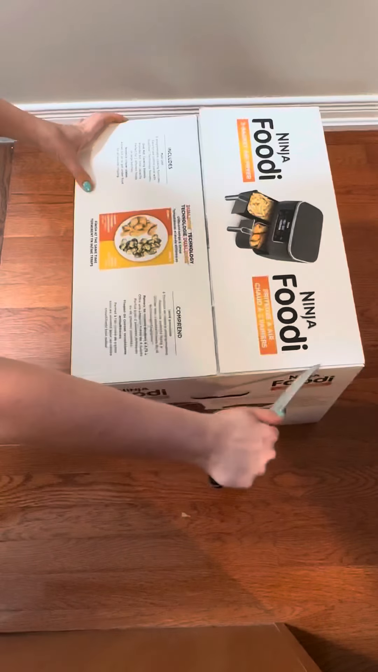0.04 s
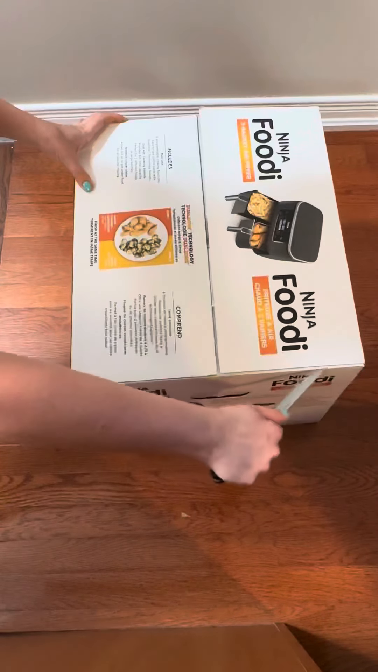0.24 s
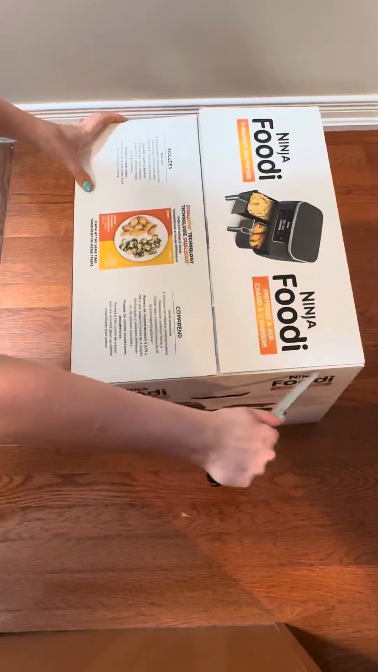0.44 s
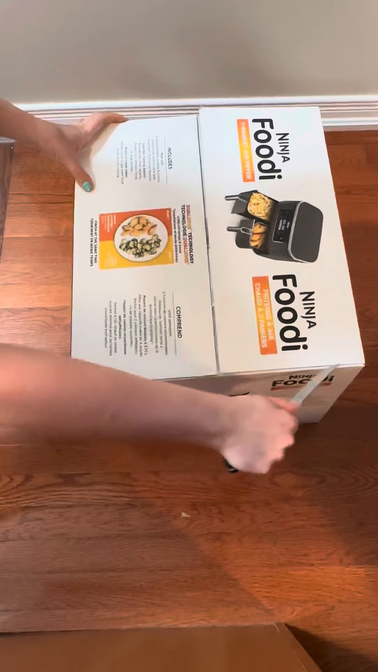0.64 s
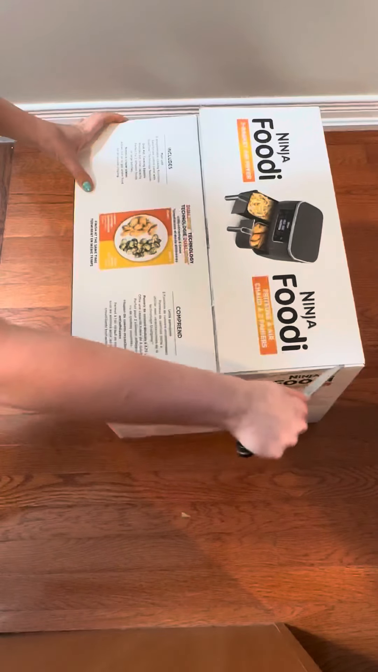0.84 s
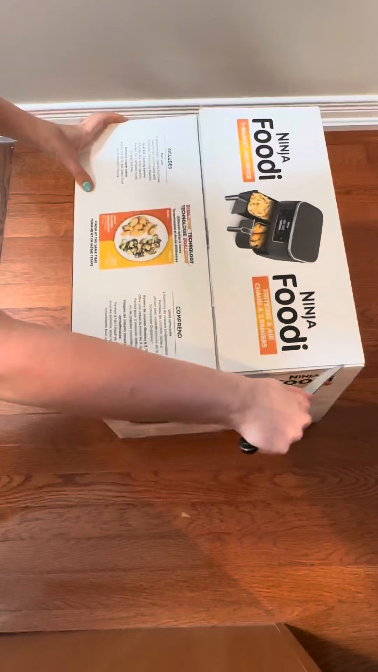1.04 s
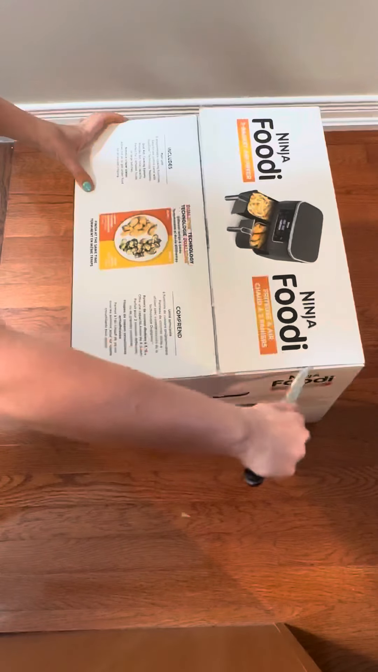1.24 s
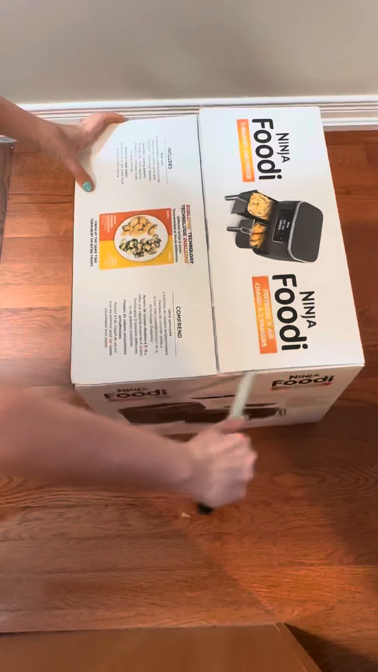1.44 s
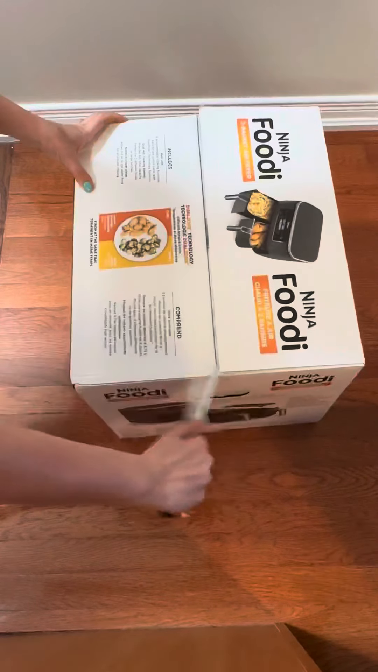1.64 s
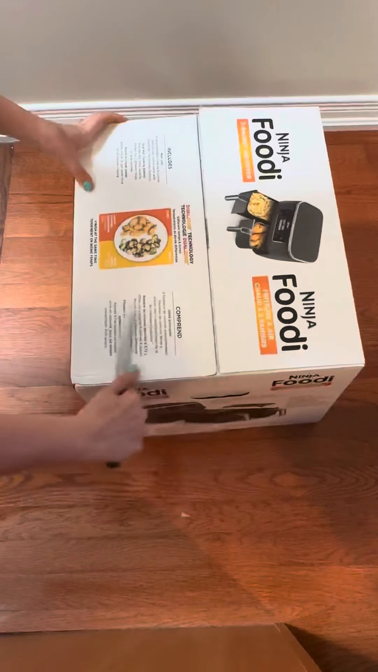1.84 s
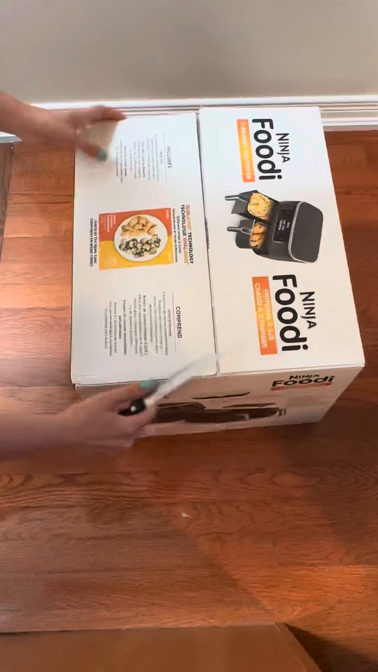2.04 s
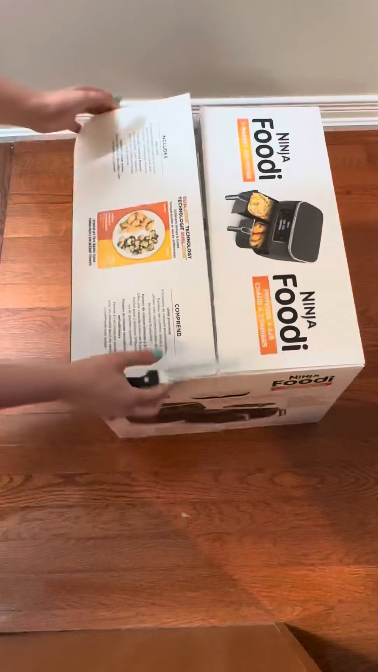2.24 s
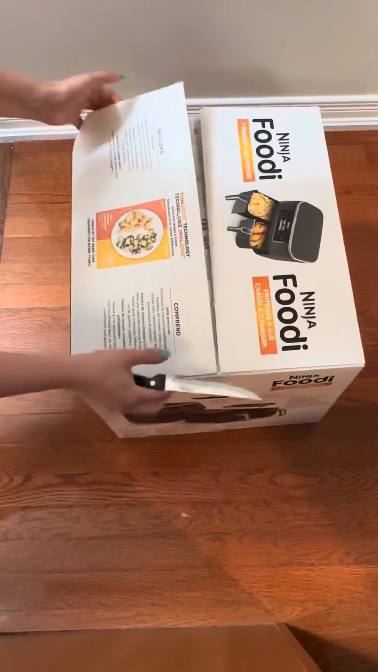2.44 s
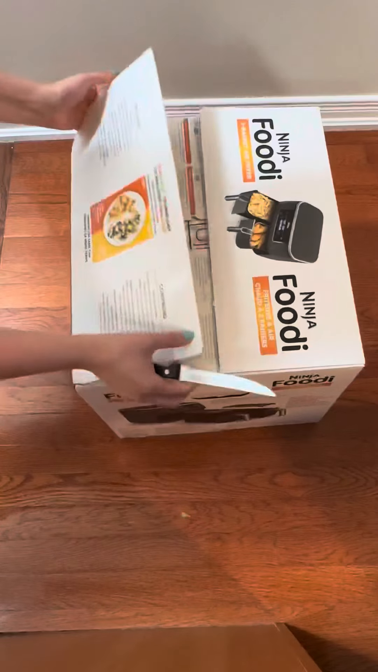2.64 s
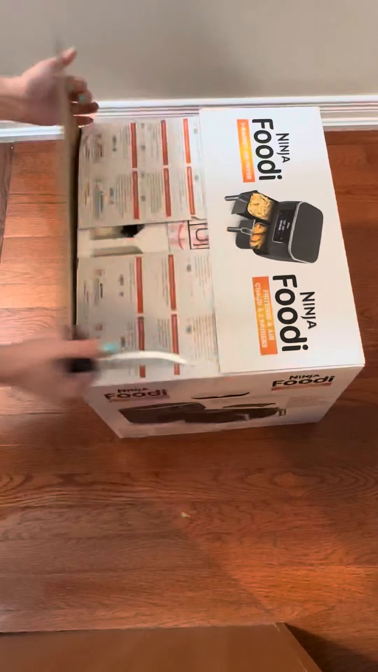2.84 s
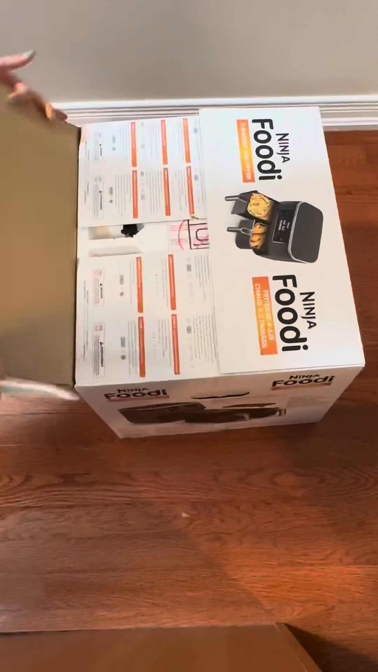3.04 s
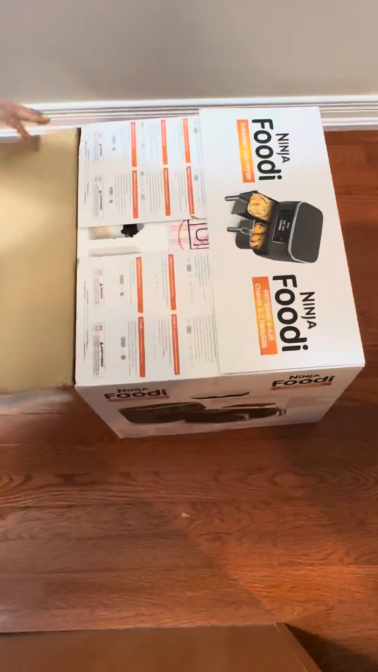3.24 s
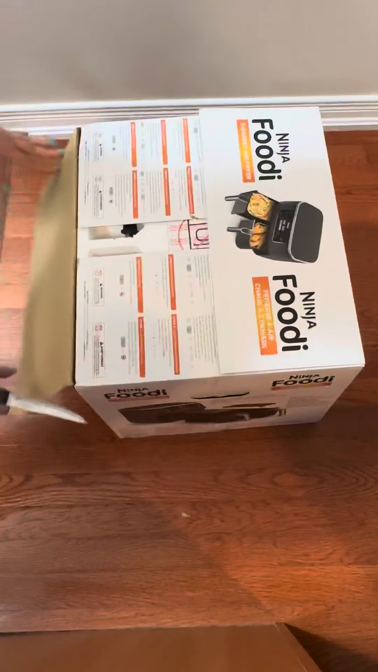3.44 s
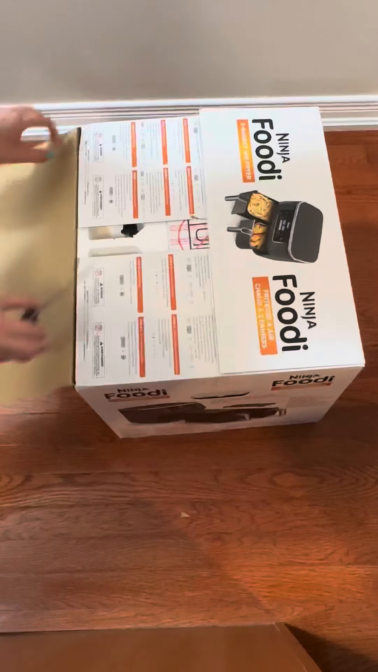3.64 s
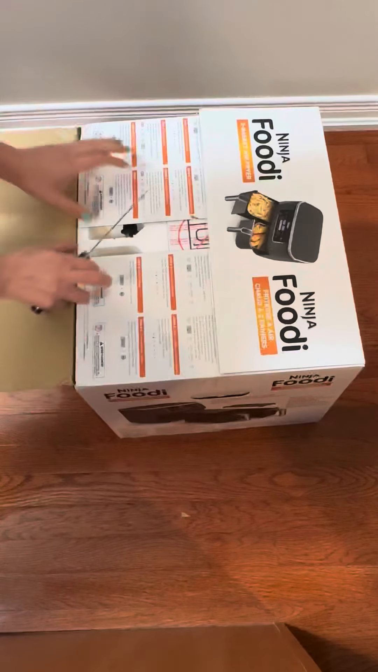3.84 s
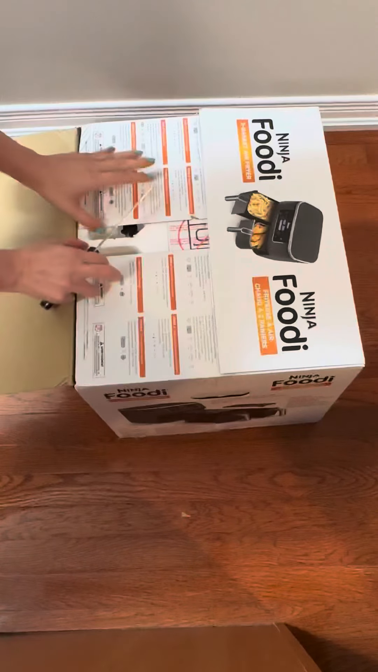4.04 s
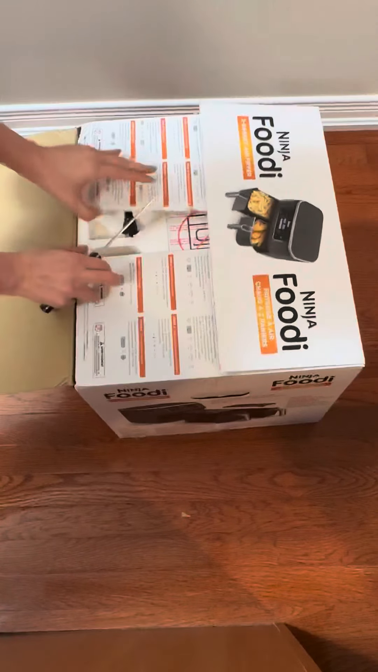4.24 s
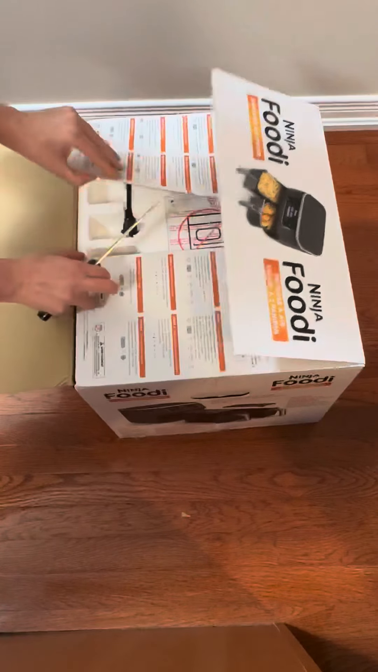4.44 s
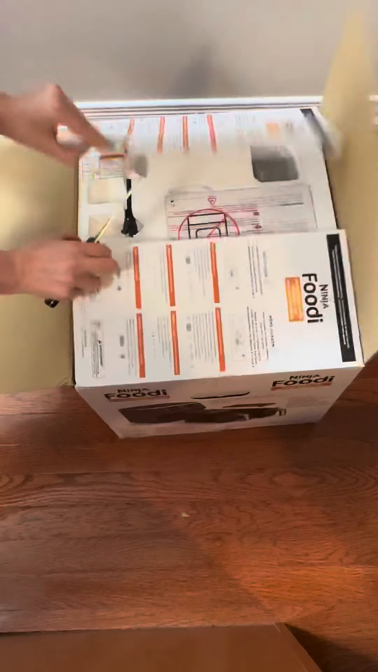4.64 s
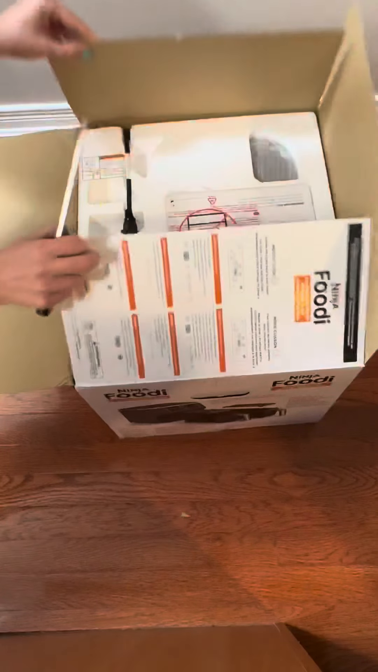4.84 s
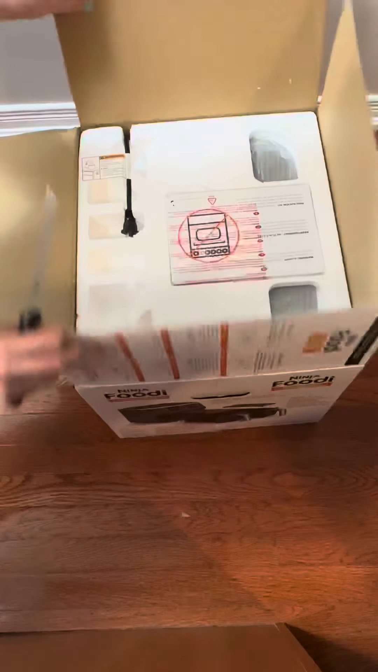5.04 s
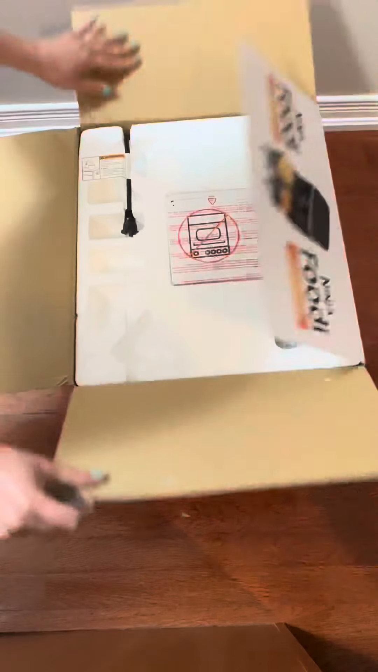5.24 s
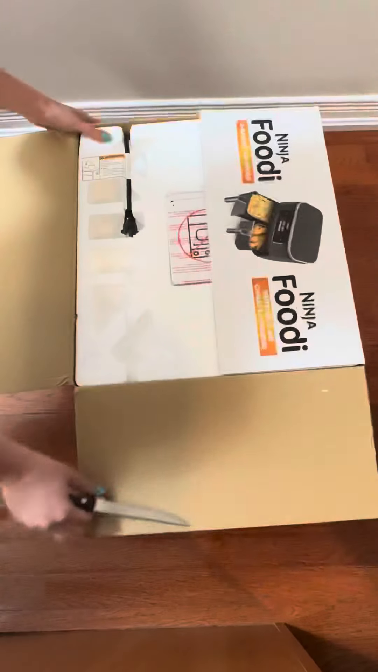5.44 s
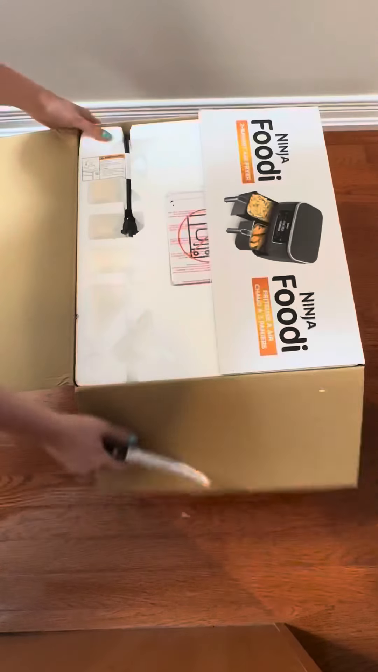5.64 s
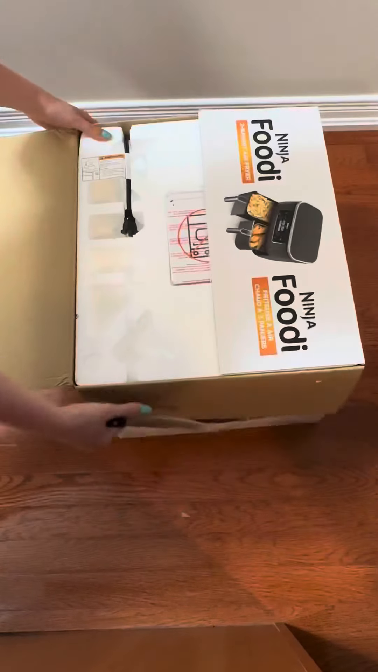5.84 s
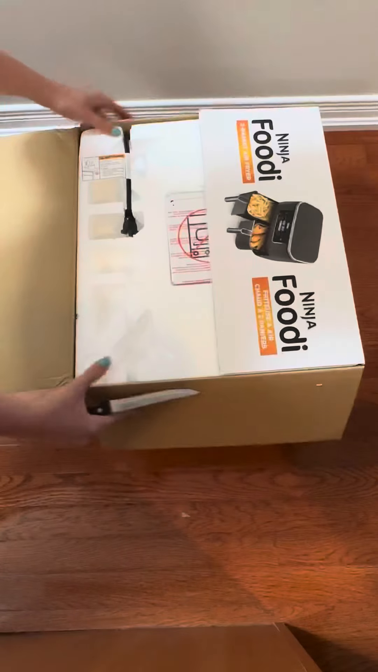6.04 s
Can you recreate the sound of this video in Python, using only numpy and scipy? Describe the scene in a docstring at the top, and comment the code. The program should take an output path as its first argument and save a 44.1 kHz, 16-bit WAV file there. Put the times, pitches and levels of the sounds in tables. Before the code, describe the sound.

Low, soft room hum throughout, close stereo pickup in a small live room. For the first second there are only faint ticks and barely audible rubbing. From 1.1 to 1.6 s a knife rasps through tape, swelling with a fast fluttering buzz, crisp snaps and a low groan, ending in a loud pop and dull thump at 1.55. Short creaks and crackle follow to 1.8, then light taps and small squeaks until 2.4. A sharp crack at 2.55 leads to board scraping and a heavy hollow thump at 2.95, with softer bumps to 3.3. Gentle scuffs and a light knock fill 3.4 to 4.4. At 4.6 the cardboard squeaks and groans; from 4.8 to 5.05 comes the densest burst of hard knocks, crackling creases and creaks. Sharp knocks at 5.29 and 5.39, a creak near 5.45, snapping fibres around 5.65, a knock at 5.75, and a final tap, scrape and tiny squeak at 6.0.

```python
"""Cutting and opening a cardboard box

A knife saws through the packing tape of a box on a wooden floor, then the flaps are pulled open.
Filtered noise grains, modulated at each flute, make the cut; swelling noise makes board slide on board.
Gliding tones make the stick-slip, runs of tiny rings the creases, short noise bursts the snapping fibres.
Blows add noise bursts, bending-wave chirps and damped modes; a small live room answers at two phone ports."""
import sys
import numpy as np
from scipy import signal
from scipy.fft import rfft, irfft
from scipy.io import wavfile

SR = 44100
rng = np.random.default_rng(int(sys.argv[2]) if len(sys.argv) > 2 else 0)


def dump(signal):
    """Clip the signal to [-1, 1] and save it as 16-bit WAV at the path in sys.argv[1]."""
    limited = np.clip(np.atleast_2d(signal).T, -1, 1)
    pcm = np.round(limited * 32767).astype(np.int16)
    wavfile.write(sys.argv[1], SR, pcm)


N = 269010
TIME = np.arange(N) / SR  # s
HIT_TIME = TIME[:SR // 3]  # s, the span of one short sound

# low noise of the panel under pressure: f/Hz, level/dB
RUMBLE = [(70, -49), (150, 13.5), (240, 11.5), (380, 12), (560, 5.5), (750, -25), (1300, -47.5)]
# middle band of board or tape rubbed: f/Hz, level/dB
SCRAPE = [(350, -9), (700, 14), (1050, 10.5), (1400, 6), (1900, 5.5), (2800, 5), (3800, -6), (6000, -47.5)]
# dull knock of a hard contact: f/Hz, level/dB
CLACK = [(300, -42.5), (560, -10), (700, -12.5), (950, -9), (1300, -18), (2000, -52)]
# fracture of the board: f/Hz, level/dB
CRACK = [(700, -29.5), (1300, -2.5), (1800, -1), (2300, -6), (2900, -5), (3800, -14), (6000, -31.5)]
# treble of fine fibres: f/Hz, level/dB
HISS = [(2200, -12), (3800, 3), (5000, 2), (6400, 6.5), (8000, 2.5), (10000, 5), (12500, -30.5),
        (15000, 10), (16500, -44)]


def undb(db):
    """Amplitude ratio: decibels to linear gain."""
    return 10 ** (np.asarray(db) / 20)


def unit(x):
    """Power normalisation: scale to rms 1."""
    return x / np.sqrt(np.mean(x ** 2))


def blow(x):
    """Energy normalisation: scale a short sound to the energy of 30 ms at rms 1."""
    return x / np.sqrt(np.sum(x ** 2) / (.03 * SR))


def colour(x, spectrum):
    """Minimum-phase filtering: the folded cepstrum of a (f/Hz, level/dB) outline gives a causal response."""
    size = 4096
    hz, db = np.transpose(spectrum)
    bins_hz = np.fft.rfftfreq(size, 1 / SR) + 1
    outline_db = np.interp(np.log(bins_hz), np.log(hz), db)
    cepstrum = irfft(np.log(undb(outline_db)))
    cepstrum[1:size // 2] *= 2
    cepstrum[size // 2 + 1:] = 0
    response = irfft(np.exp(rfft(cepstrum)))
    return signal.fftconvolve(x, response)[:len(x)]


def add(track, s, x):
    """Superposition: mix a sound in at time s."""
    i = max(int(s * SR), 0)
    track[i:i + len(x)] += x[:max(N - i, 0)]


def wander(rate):
    """Random modulation: a value of spread near 1 that moves between new draws, rate of them per second."""
    steps = rng.standard_normal(N // 20)
    return np.interp(TIME * rate, np.arange(len(steps)), steps)


def judder(rate, depth_db):
    """Uneven friction: the grip wanders in gain at the given rate."""
    return unit(undb(depth_db * wander(rate)))


def swell(s, half_s):
    """Gaussian envelope: a smooth rise and fall around time s."""
    return np.exp(-np.minimum(((TIME - s) / half_s) ** 2 / 2, 20))


def grains(rate, spread_db, smooth):
    """Granular friction: fibres catch and let go as clicks of uneven size over a smooth rub."""
    sizes = undb(spread_db * np.minimum(rng.exponential(size=N), 5)) * rng.choice([-1, 1], N)
    clicks = sizes * (rng.random(N) < rate / SR)
    return unit(unit(clicks) + smooth * rng.standard_normal(N))


def burst(spectrum, decay_s, tail_db, tail_s, rise_s):
    """Impulsive fracture: noise with a fast decay, followed by the slower decay of its scatter in the box."""
    shape = np.exp(-HIT_TIME / decay_s) + undb(tail_db) * np.exp(-HIT_TIME / tail_s)
    shape *= 1 - np.exp(-HIT_TIME / rise_s)
    return blow(colour(rng.standard_normal(len(shape)) * shape, spectrum))


def ring(modes, rise_s, scatter_db):
    """Modal vibration: damped modes build up as the bend spreads; each contact weights them anew."""
    hz, db, t60 = np.transpose(modes)[:, :, None]
    weight, detune, phase = rng.standard_normal((3, len(modes), 1))
    waves = np.sin(2 * np.pi * (hz * (1 + 0.0096 * detune) * HIT_TIME + phase))
    decay = np.exp(-np.log(1000) * HIT_TIME / t60)
    modal_sum = (undb(db + scatter_db * weight) * waves * decay).sum(axis=0)
    return blow(modal_sum * (1 - np.exp(-(HIT_TIME / rise_s) ** 2)))


def struck_near(modes, main_hz, lift_db):
    """Modal excitation: the place of a blow favours the modes near one frequency."""
    def lift(hz):
        return lift_db * np.exp(-(np.log(hz / main_hz) / 0.083) ** 2)
    return [(hz, db + lift(hz), t60) for hz, db, t60 in modes]


def bend(top_hz, crossing_s):
    """Dispersion: short bending waves arrive first, a falling chirp that starts lower for a lower top_hz."""
    slope_db_per_octave, low_hz = -4, 139
    hz = np.fft.rfftfreq(len(HIT_TIME), 1 / SR) + 1
    travel_s = crossing_s * np.sqrt(1000 / hz)
    late_s = np.clip(travel_s - np.interp(1.5 * top_hz, hz, travel_s), 0, .04) + .0005
    gain = undb(slope_db_per_octave * np.log2(hz))
    gain = gain / np.hypot(1, (hz / top_hz) ** 4) / np.hypot(1, (low_hz / hz) ** 3)
    # phase is the running sum of the group delay
    wave = irfft(gain * np.exp(-2j * np.pi * np.cumsum(late_s) * SR / len(HIT_TIME)))
    return blow(wave[:len(wave) // 2])


def resonate(x, peaks):
    """Resonance: a bank of (f/Hz, width/Hz, level/dB) peaks; soft board never rings sharply."""
    out = 0
    for hz, width, db in peaks:
        b, a = signal.iirpeak(hz, min(hz / width, 20), SR)
        out = out + undb(db) * signal.lfilter(b, a, x)
    return out


def knife():
    """Amplitude modulation: the tearing tape swells at each flute the blade bites; the lid under it drums."""
    # resonances of the taut tape and the lid under the blade: f/Hz, width/Hz, level/dB
    lid = [(422, 19, 14.5), (587, 43, 10.5), (790, 82, -15), (2050, 360, 0.5), (2470, 280, -0.5),
           (3130, 82, 1)]
    start_s, attack_s, end_s, release_s = 1.084, 0.26, 1.525, 0.095
    rasp_db, drum_db = -36, -40.5  # gains at full force
    flute_hz, flute_unrest = 49.92, .16  # flutes crossed per second; timing spread in flutes
    flute_gain = .9  # tearing between flutes
    bite_spread_db, bite_s = 3.5, .003

    # the blade is leaned on until it runs at full force, then comes free
    lean = np.clip((TIME - start_s) / attack_s, 0, 1) ** 1.27
    force = lean * np.clip(1 - (TIME - end_s) / release_s, 0, 1)

    gap, size, bright = rng.standard_normal((40, 3)).T
    times = end_s - (np.arange(len(gap)) + flute_unrest * gap) / flute_hz - 2 * bite_s
    bite, fine_bite = np.full((2, N), flute_gain)
    catch = np.exp(-(HIT_TIME / bite_s - 2) ** 2)
    for s, db, bright_db in zip(times, bite_spread_db * size, bite_spread_db * bright):
        add(bite, s, undb(min(db, bite_spread_db)) * catch)
        add(fine_bite, s, undb(min(bright_db, bite_spread_db)) * catch)

    tear = bite * grains(rate=3000, spread_db=3.0, smooth=0.93) * judder(rate=320, depth_db=2.6)
    fibres = fine_bite * grains(rate=1100, spread_db=1.5, smooth=0.77)
    edge = undb(-10.5) * unit(colour(tear, SCRAPE)) + undb(-18.0) * unit(colour(fibres, HISS))
    rasp = undb(rasp_db) * (edge + undb(-8.0) * unit(resonate(tear, lid)))
    drum = undb(drum_db) * unit(colour(grains(rate=900, spread_db=4.5, smooth=0.43), RUMBLE))
    return force * (rasp + force * drum)  # the drum grows with the square of the force


def sliding():
    """Sliding friction: board or hand drags over board in uneven jerks; pressure makes the panel rumble."""
    # strokes: t at the strongest/s, rise/s, fall/s, level/dB, brightness/dB, pressure on the panel/dB
    strokes = [(.221, 0.035, 0.038, -66, -11.5, -4), (.93, 0.15, 0.17, -71, -15, 7.5),
               (1.544, 0.0029, 0.0048, -25, 3.5, -4), (1.676, 0.007, 0.02, -38, -6, 4),
               (1.723, 0.022, 0.045, -51, -1.5, 3), (2.06, 0.046, 0.065, -55, 0, 7),
               (2.22, 0.034, 0.031, -57, 7.5, -6), (2.422, 0.037, 0.03, -49.5, 1, -4),
               (2.606, 0.043, 0.026, -46.5, 2, 10), (2.93, 0.066, 0.065, -50, -1, 0.5),
               (3.11, 0.032, 0.029, -53, 1, 6), (3.25, 0.03, 0.041, -43.5, -7.5, -3),
               (3.362, 0.0042, 0.026, -46.5, -13.5, 3.5), (3.55, 0.14, 0.14, -62.5, -11, 4),
               (3.609, 0.012, 0.015, -48.5, -3.5, -2), (3.643, 0.0054, 0.0095, -45, -9.5, 2),
               (3.927, 0.02, 0.037, -51, -3, 3), (4.1, 0.049, 0.074, -51, -5.5, -1.5),
               (4.35, 0.069, 0.12, -58.5, -4, 6.5), (4.628, 0.024, 0.025, -35, 1.5, -6.5),
               (4.895, 0.011, 0.066, -41, -17, -9), (4.915, 0.0031, 0.014, -39.5, 7.5, -9),
               (5.036, 0.023, 0.041, -31, -1.5, -8), (5.185, 0.0026, 0.011, -38, 6, 1),
               (5.35, 0.073, 0.046, -50, 1, 3), (5.476, 0.014, 0.022, -34.5, 2, -4),
               (5.66, 0.034, 0.1, -53.5, 6.5, 6.5), (6.035, 0.024, 0.056, -42, -0.5, 2)]
    # colour of the finest fibres: f/Hz, level/dB
    sizzle_spectrum = [(7000, -21), (10000, 19), (12500, -7), (15000, 19), (16500, -51)]
    shape = 1.4  # 1 = pointed swell, 2 = rounded
    crackle_db = -12  # against the stroke

    scrape, rumble, hiss = np.zeros((3, N))
    for s, rise_s, fall_s, db, bright_db, pressure_db in strokes:
        away = np.maximum((s - TIME) / rise_s, (TIME - s) / fall_s)
        stroke = undb(db) * np.exp(-np.minimum(away ** shape / 2, 20))
        scrape += stroke
        rumble += undb(pressure_db) * stroke
        hiss += undb(bright_db) * stroke
    sizzle = undb(-53) * hiss * (hiss / undb(-31)) ** 0.12  # a harder rub is brighter

    rub = grains(rate=4000, spread_db=-0.5, smooth=0.62) * judder(rate=65, depth_db=3.5)
    layers = (rumble, RUMBLE), (scrape, SCRAPE), (hiss, HISS), (sizzle, sizzle_spectrum)
    rubbing = sum(gain * unit(colour(rub, spectrum)) for gain, spectrum in layers)
    return rubbing + undb(crackle_db) * scrape * crackle()


def crackle():
    """Random impulses: single fibres break now and then, with the crack and hiss of the board."""
    breaks_per_s, spread_db = 29, -16
    sizes = undb(spread_db * np.minimum(rng.exponential(size=N), 3))
    breaks = sizes * (rng.random(N) < breaks_per_s / SR)
    pop = burst(CRACK, decay_s=0.0013, tail_db=4, tail_s=0.013, rise_s=0.00038)
    pop = pop + undb(-11.0) * burst(HISS, decay_s=0.00042, tail_db=15, tail_s=0.0082, rise_s=0.000067)
    return unit(signal.fftconvolve(breaks, pop)[:N])


def chatter():
    """Stick-slip: an edge grips and slips in step with a resonance, unsteady in pitch and strength."""
    # groans to squeaks: t at the strongest/s, half length/s, f/Hz, glide/(octaves per s), level/dB
    slips = [(1.44, 0.071, 149.8, 0, -38.5), (1.612, 0.029, 231.8, 2.5, -36), (1.733, 0.017, 422, 3, -31.5),
             (1.745, 0.019, 576, 1.5, -40.5), (2.158, 0.016, 1603, -4.5, -51.5),
             (2.388, 0.01, 1650, 3.5, -49.5), (2.417, 0.033, 2870, 0, -52), (2.432, 0.017, 1990, -1, -44.5),
             (4.604, 0.028, 2410, -4, -41), (4.605, 0.021, 1763, -0.5, -44), (4.619, 0.034, 770, 0, -42.5),
             (4.657, 0.017, 387, -6.5, -34.5), (4.603, .06, 396.6, -1, -43.5),
             (4.915, 0.022, 620, -1, -30.5), (4.963, 0.014, 530.3, 1, -29),
             (5.023, 0.013, 522.6, -1.5, -28.5), (5.065, .028, 248.2, -2, -38.5),
             (5.438, 0.027, 356.2, -0.5, -39.5), (5.482, .011, 781, 1, -37.5),
             (5.495, 0.017, 350.3, 3, -37.5), (6.012, 0.007, 2770, 0, -40), (6.014, 0.0065, 3520, 2.5, -42),
             (6.045, 0.024, 2730, -1, -52), (6.03, 0.021, 1470, 1, -50)]
    groan_unrest, squeak_unrest = .055, .08  # pitch spread as a fraction of f

    out, grip = np.zeros(N), judder(rate=170, depth_db=3.5)
    for s, half_s, hz, glide, db in slips:
        unrest = np.interp(hz, [700, 2400], [groan_unrest, squeak_unrest])
        near = np.abs(TIME - s) < 4 * half_s
        t = TIME[near]
        # the pitch moves to a new random value every two cycles
        drift = np.interp((t - t[0]) * hz / 2, np.arange(1024), rng.standard_normal(size=1024))
        pitch_hz = hz * 2 ** (glide * (t - s)) * (1 + unrest * drift)
        tone = np.sqrt(2) * np.sin(2 * np.pi * np.cumsum(pitch_hz) / SR)
        out[near] += undb(db) * (swell(s, half_s) * grip)[near] * tone
    return out


def crumples():
    """Successive fracture: a crease gives way in a run of tiny rings, each with its own pitch and size."""
    # creases and torn edges: t at the strongest/s, half length/s, central f/Hz, level/dB
    creases = [(0.941, .03, 3830, -67.5), (1.673, 0.0076, 2650, -39.5), (1.715, .018, 1770, -39.5),
               (2.141, 0.0019, 1980, -46), (2.27, 0.0057, 2760, -53), (2.426, 0.03, 2010, -50),
               (4.575, 0.038, 2360, -43.5), (4.633, 0.021, 2970, -44), (4.822, 0.011, 1700, -32.5),
               (4.93, .022, 2020, -35), (5.041, 0.024, 2250, -50), (5.441, 0.006, 1420, -31)]
    fractures_per_s, spread_octaves, spread_db = 700, .7, 3.2
    ring_cycles = 1.8  # cycles in which a ring falls to 1/e

    out = np.zeros(N)
    t = HIT_TIME[:SR // 100]
    for s, half_s, hz, db in creases:
        run = np.zeros(N)
        count = int(4 * half_s * fractures_per_s) + 1
        when, pitch, size = rng.standard_normal((200, 3))[:count].T
        times = s + half_s * np.linspace(-2, 2, len(when)) + when / fractures_per_s / 2
        pitches_hz = hz * 2 ** (spread_octaves * np.tanh(pitch))
        for at, f, size_db in zip(times, pitches_hz, spread_db * size):
            add(run, at, undb(size_db) * np.sin(2 * np.pi * f * t) * np.exp(-f * t / ring_cycles))
        out += undb(db) * blow(run * swell(s, half_s))
    return out


def knocks():
    """Impact excitation: contact cracks, a bending wave runs out, panels ring, the flap swings and moves air."""
    # blows on the box: t/s, level/dB, hardness of contact/dB, swing of the flap/dB, favoured panel f/Hz,
    # bending wave level/dB, its top f/Hz, its travel time at 1 kHz/s, favoured board f/Hz, board ring level/dB
    blows = [(1.545, -24.5, -25, -14, 232, 2, 610, 0.00514, 940, -11.5),
             (1.551, -24.5, -20, -25, 391, -7, 600, .005, 635, -19),
             (1.819, -35.5, -29, -29, 392, -4, 590, 0.00517, 635, -6.5),
             (2.193, -42, 14, 0.5, 214, 8.5, 3540, 0.00704, 1850, -2),
             (2.473, -46, -28, -16, 287, 7, 510, 0.0039, 635, -4),
             (2.55, -30.5, 12, -2, 307, 4, 2985, .0085, 705, -2),
             (2.942, -24.5, -5.5, 3.5, 230, 1.5, 563, 0.00613, 887, -18),
             (2.946, -24, -19, -25, 464, -3, 910, 0.00544, 635, -25),
             (3.003, -36, -34, -12, 463, -6, 497, .004, 710, -8),
             (3.108, -41.5, -24, 4.5, 232, 1, 330, 0.0041, 630, -4),
             (3.28, -32.5, -26, 1.5, 243, 8, 402, 0.00513, 635, -11),
             (3.892, -38, -6.5, -20, 545, 3.5, 963, 0.00603, 887, -2.5),
             (4.799, -19.5, 0.5, -12, 360, -2, 1320, 0.00415, 684, -14),
             (4.808, -21, 2.5, -16, 449, 1.5, 1370, 0.00403, 1160, -1.5),
             (4.825, -26.5, 7, -9, 232, -4, 795, 0.0039, 1060, -2),
             (4.876, -25.5, -11, -15, 390, -1, 1150, 0.0052, 834, -3),
             (4.91, -32.5, -4, -10.5, 283, -1, 800, .005, 635, -7),
             (4.942, -34, 12.5, -25, 528, -13, 1490, 0.0054, 1305, -5),
             (5.01, -37.5, -4, -18, 528, -16, 1470, 0.0048, 887, 5),
             (5.2851, -24, 3, -26, 254, 1, 2870, .0085, 657, 0),
             (5.344, -34.5, -12, -22, 302, -14, 790, 0.0043, 705, -0.5),
             (5.3893, -23, 0, -18, 355, -3.5, 1970, .004, 1660, -1),
             (5.408, -30, 0, -7.5, 215, -14, 800, 0.00484, 705, -8),
             (5.634, -33, -7, -17, 236, -1, 910, 0.0072, 830, -6.5),
             (5.748, -31.5, 7, -5.5, 562, 5.5, 1965, .008, 645, -1),
             (5.973, -34, 10, -10, 305, 2, 2070, 0.00296, 1630, -10)]
    # flap swinging on the air in the box: f/Hz, level/dB, t60/s
    flap_modes = [(82.3, 2, 0.22), (107, -14, 0.12), (134, -7.5, 0.22)]
    # panels of the box: f/Hz, level/dB, t60/s
    panel_modes = [(210, -7, 0.18), (230.2, 5, 0.2), (279.7, 1, 0.43), (304.8, -1, 0.11), (359.3, 2, 0.2),
                   (399, -7, 0.15), (421, 9.5, 0.053), (464, 0.5, 0.08), (525, 7.5, 0.055), (603, 3, 0.083)]
    # stiff short waves in the board: f/Hz, level/dB, t60/s
    board_modes = [(631.5, -2, 0.2), (700, -3.5, 0.1), (788, -1.5, 0.1), (877, -2.5, 0.098),
                   (1045, -5.5, 0.093), (1152, 2.5, 0.028), (1320, 0.5, 0.086), (1648, 0.5, 0.044),
                   (1846, 7, 0.021)]
    # air pushed out by a swinging flap: f/Hz, level/dB
    puff = [(15, -24.5), (28, -13), (45, -5), (70, -6), (100, -9.5), (135, -3), (200, -32), (400, -56)]
    clack_per_hardness, snap_per_hardness = 0.23, 0.99  # dB per dB of hardness

    out = np.zeros(N)
    for s, panel_db, hard_db, swing_db, main_hz, bend_db, top_hz, travel_s, board_hz, board_db in blows:
        thump_db, crack_db = panel_db + swing_db, panel_db + hard_db
        clack_db = panel_db + clack_per_hardness * hard_db
        snap_db = panel_db + snap_per_hardness * hard_db
        struck_panel = struck_near(panel_modes, main_hz, lift_db=17)
        struck_board = struck_near(board_modes, board_hz, lift_db=12)

        def layer(db, sound):
            add(out, s, undb(db) * sound)

        layer(panel_db + bend_db - 5.5, bend(top_hz, travel_s))
        layer(thump_db + 2.0, ring(flap_modes, rise_s=0.01, scatter_db=1.5))
        layer(thump_db - 9, burst(puff, decay_s=0.084, tail_db=-25, tail_s=0.14, rise_s=0.014))
        layer(panel_db - 2.0, ring(struck_panel, rise_s=0.0036, scatter_db=1.1))
        layer(panel_db - 12.5, burst(RUMBLE, decay_s=0.0082, tail_db=-5, tail_s=0.045, rise_s=0.002))
        layer(panel_db + board_db - 5.5, ring(struck_board, rise_s=0.0035, scatter_db=-1.1))
        layer(clack_db - 13, burst(CLACK, decay_s=0.0017, tail_db=-9.5, tail_s=0.039, rise_s=0.00081))
        layer(crack_db - 16.0, burst(CRACK, decay_s=0.0036, tail_db=-6, tail_s=0.019, rise_s=0.0012))
        layer(snap_db - 31, burst(HISS, decay_s=0.0014, tail_db=-44, tail_s=0.024, rise_s=0.00044))
    return out


def ticks():
    """Impulsive radiation: small fractures give brief noise bursts, too light to swing a flap."""
    # fibres parting, creases cracking, nails tapping: t/s, level/dB, brightness/dB
    fractures = [(0.0364, -46.5, -20), (0.3522, -47.5, -22), (0.7656, -49.5, -35), (1.2526, -41, -3),
                 (1.3335, -31, -8), (1.3789, -35.5, 4.5), (1.442, -27, -5.5), (1.481, -31, -3),
                 (1.537, -22, -4), (1.5453, -20.5, 2), (1.6566, -36.5, 8), (1.9089, -33, -26),
                 (2.0268, -35, -15), (2.1373, -40.5, 0), (2.195, -45.5, 9), (2.551, -26, 0),
                 (2.5956, -26.5, -1.5), (3.0702, -31.5, -14), (3.1764, -32, -7), (4.2238, -43.5, -16.5),
                 (4.808, -26.5, 2.5), (4.877, -21, -10.5), (4.941, -20.5, 0), (5.0098, -25.5, 2),
                 (5.1789, -26.5, -18), (5.3476, -35.5, 4.5), (5.3652, -31.5, 0), (5.418, -30.5, 3),
                 (5.6322, -22, -6), (5.6441, -25, -0.5), (5.6737, -30, -1.5), (5.694, -26.5, -5.5),
                 (5.752, -36.5, 8), (6.003, -33.5, -4)]
    # sharp edge of a snapping fibre: f/Hz, level/dB
    snap = [(5000, -27), (9000, 4.5), (12500, -1.5), (15000, 1.5), (16500, -14)]

    out = np.zeros(N)
    for s, db, bright_db in fractures:
        snap_db = db + bright_db

        def layer(layer_db, sound):
            add(out, s, undb(layer_db) * sound)

        layer(db - 18.5, burst(CLACK, decay_s=0.014, tail_db=-1, tail_s=0.0088, rise_s=0.0023))
        layer(db - 20.0, burst(CRACK, decay_s=0.0021, tail_db=-14, tail_s=0.033, rise_s=0.00024))
        layer(snap_db - 12.5, burst(HISS, decay_s=0.0032, tail_db=-16, tail_s=0.047, rise_s=0.00031))
        layer(snap_db - 16.0, burst(snap, decay_s=0.0005, tail_db=-30, tail_s=0.0078, rise_s=0.00018))
    return out


def room(x, wet_db, early_db, early_s):
    """Reverberation: floor and near wall answer early, the room later; long waves reach both ports alike."""
    # decay of the room: f/Hz, t60/s
    room_t60 = [(150, 0.93), (500, 0.52), (2000, 0.65), (6000, 0.53), (15000, 0.013)]
    hz, _, spec = signal.stft(rng.standard_normal((2, SR)), SR, nperseg=256)
    hz, t = hz[:, None], np.linspace(0, 1, spec.shape[-1])
    t60 = np.interp(hz, *np.transpose(room_t60))
    late = undb(wet_db) * np.exp(-np.log(1000) * t / t60)
    spec *= late + undb(early_db) * np.exp(-t / early_s)
    spec *= np.interp(hz, [100, 300, 550, 1200], [0.3, 0.62, 0.9, 0.74])
    spec[1] *= np.interp(hz, [150, 300, 550, 2000], [0, 0.0, 1.1, 0.85])  # side signal against mid
    answer = signal.istft(spec, SR)[1]
    answer[:, :int(.003 * SR)] = 0  # no answer in the first 3 ms
    mid, side = answer
    return np.array([signal.fftconvolve(x, mid + sign * side)[:N] for sign in (1, -1)])


def hum():
    """Stationary noise: low steady air noise of the house, nearly coherent at both ports."""
    # relative spectrum of the quiet room: f/Hz, level/dB per Hz
    hum_spectrum = [(15, -9), (25, -41.5), (54, -5), (96, -10), (144, -2), (208, -14), (244, -10),
                    (353, -18.5), (414, -24.5), (460, -20), (569, -27), (1100, -39.5), (1510, -44.5),
                    (3530, -54), (14000, -77)]
    mid, side = (unit(colour(rng.standard_normal(N), hum_spectrum)) for _ in range(2))
    return undb(-45.5) * (mid + undb(-19.0) * side * np.array([[1], [-1]]))


def scene():
    """Superposition: the direct sound of the box, its answer from the room and the steady noise."""
    box = knife() + sliding() + chatter() + crumples() + knocks() + ticks()
    return box + room(box, wet_db=-38.5, early_db=-18.0, early_s=0.0019) + hum()


def record(dry):
    """Two-port reception: the ports differ in level at low f and in phase at high f; the top is cut."""
    # phase by which the left port leads: f/Hz, phase/rad
    port_phase = [(0, 0), (500, 0), (950, -.3), (1500, .1), (4900, .1), (7500, -1.5), (9100, -1.8),
                  (11000, -3.1), (13600, -3.14), (16000, -4.4)]
    top_hz = 16300
    hz = np.fft.rfftfreq(N, 1 / SR)
    lead = np.interp(hz, *np.transpose(port_phase))
    left_db = np.interp(hz, [60, 280, 550, 950], [.5, 2.6, 2.7, 0])  # left against right
    half = undb(left_db / 2) * np.exp(1j * lead / 2)  # each port takes half of the difference
    ports = irfft(rfft(dry) * np.array([half, 1 / half]), N)
    return signal.sosfilt(signal.ellip(8, .2, 70, top_hz, fs=SR, output="sos"), ports)


dry = scene()
out = record(dry)
dump(out)
```